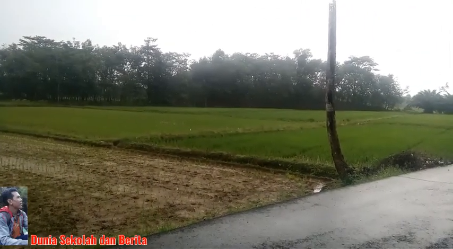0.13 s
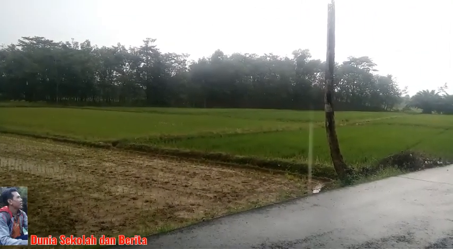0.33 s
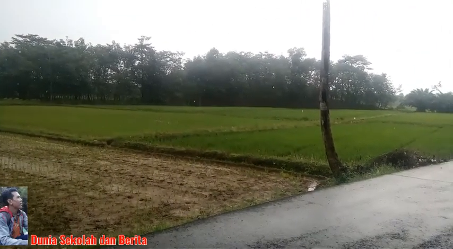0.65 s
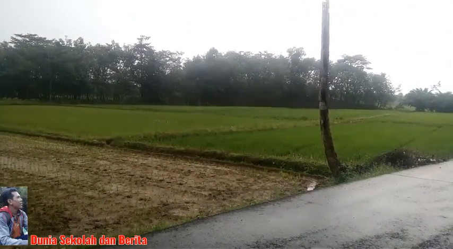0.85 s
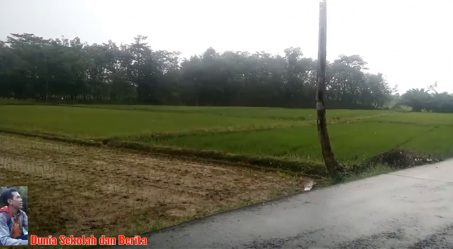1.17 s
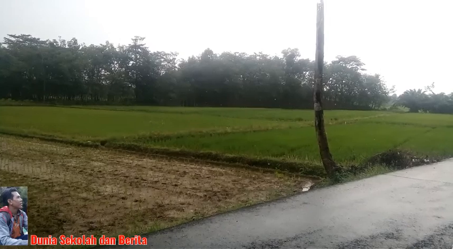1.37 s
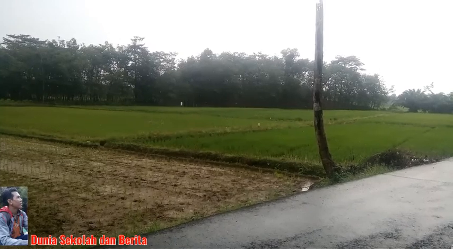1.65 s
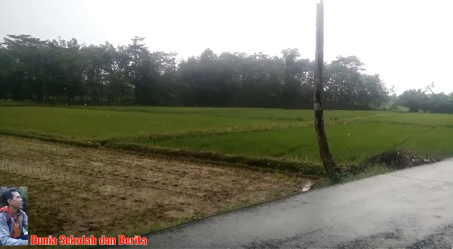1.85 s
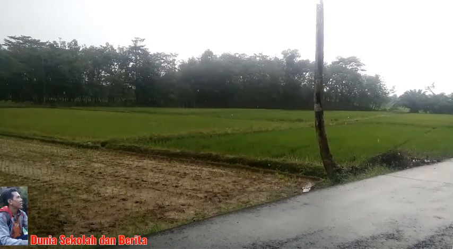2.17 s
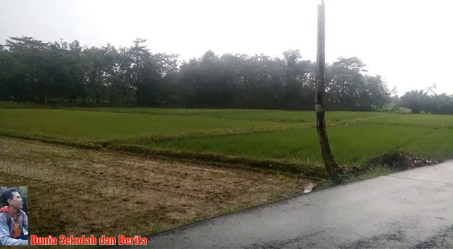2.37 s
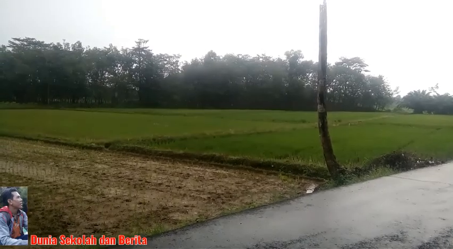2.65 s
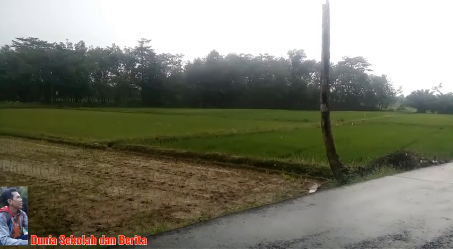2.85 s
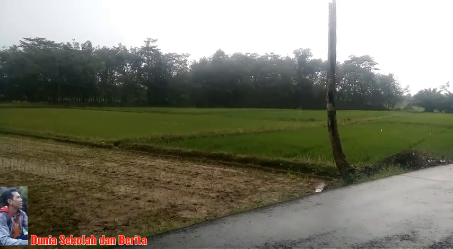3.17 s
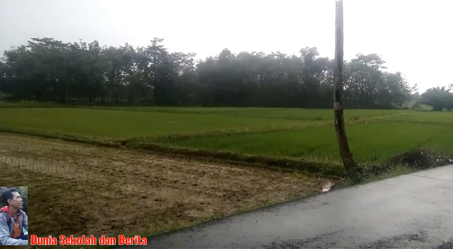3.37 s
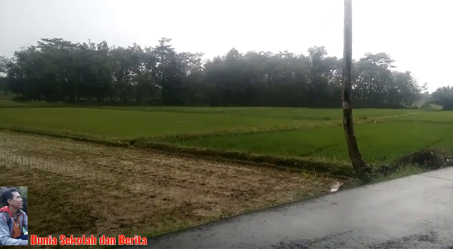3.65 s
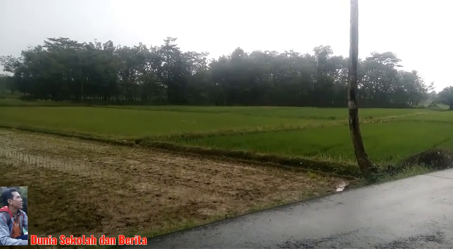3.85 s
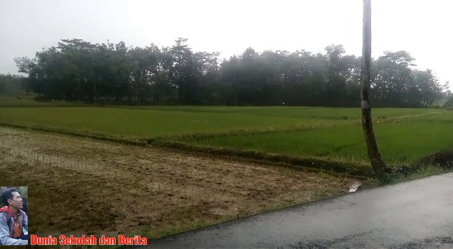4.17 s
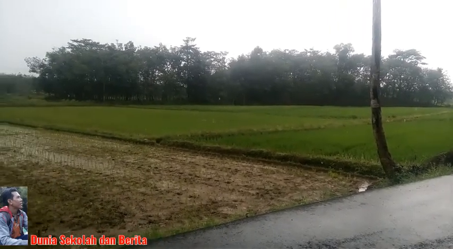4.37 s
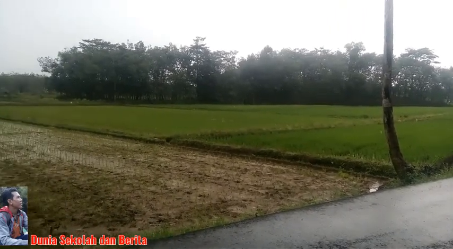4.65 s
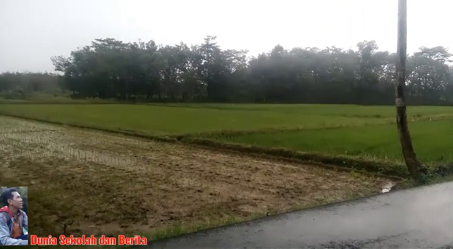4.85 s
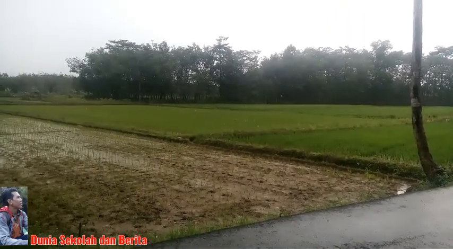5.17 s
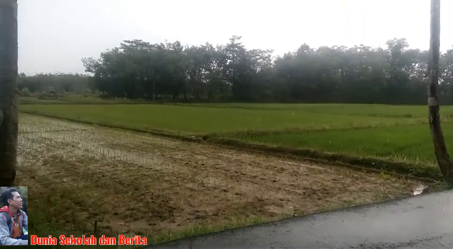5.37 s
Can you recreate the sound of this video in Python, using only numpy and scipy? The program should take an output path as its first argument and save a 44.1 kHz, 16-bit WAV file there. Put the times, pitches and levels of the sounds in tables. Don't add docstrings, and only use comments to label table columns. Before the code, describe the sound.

Continuous rain over open fields and a wet road, captured in mono by a small, narrow-sounding microphone. Distant drops merge into an even hiss centred around 4 kHz, with fine, clumpy patter on top. From 0 to about 1.1 seconds, very soft low wind bumps flutter beneath; one more comes near 1.4, and a faint breath of wind around 2.2. Close drops make short dry ticks with a small ringing splash: one at 0.4, a stronger one at 1.05, and the loudest, a sharp click, at about 1.75. The stretch from 1.9 to 3.1 is mostly plain rain with one tick near 2.65. Smaller ticks come often from 3.2 to 4.8, one splashier near 3.97, and a last one at 5.3. Patter thins near 4, briefly returns, then fades by 5.5 while the hiss stays steady. A very faint distant motor hums low; treble is thin, grainy and intermittently dropping out.

```python
import sys
import numpy as np
from scipy import signal
from scipy.fft import rfft, irfft
from scipy.io import wavfile
from scipy.ndimage import uniform_filter1d

SR = 44100
rng = np.random.default_rng(int(sys.argv[2]) if len(sys.argv) > 2 else 0)


def linear_from_db(decibels):
    return 10 ** (np.asarray(decibels, float) / 20)


def wav_out(sig):
    wavfile.write(sys.argv[1], SR, np.round(np.clip(np.atleast_2d(sig).T, -1, 1) * 32767).astype(np.int16))


N = 242991

# (time [s], hiss level [dB], patter level [dB])
SHOWER_DB = [
    (0.0, -39, -44.5),
    (4.0, -39.5, -51.5),
    (4.34, -39.5, -45.5),
    (5.12, -40, -50),
    (5.51, -38.5, -59),
]
# (frequency [Hz], density [dB per Hz])
PORT_DB = [(45, -19), (75, -13.5), (220, -16.5), (300, -16.5), (600, -12), (1200, -11), (2200, -7),
           (3300, -5), (4000, 0), (4600, -1), (5200, -9), (6500, -15.5), (7900, -29.5), (12000, -67.5)]
# (time [s], peak [dB], body [dB re peak], spray [dB re peak])
CLOSE_DROPS = [(0.077, -20.5, -15, -25), (0.4103, -16.5, -18, -17), (0.4258, -19.5, -9, -16),
               (1.0433, -13, -8.5, -14), (1.1488, -19.5, -8.5, -29), (1.4076, -20.5, -16, -13),
               (1.5913, -23.5, -10, -14), (1.7466, -7, -10, -17.5), (1.8386, -21.5, -12, -19),
               (1.8635, -17.5, -8.5, -32), (2.642, -19.5, -20, -20), (3.1713, -22, -15, -26),
               (3.3029, -17, -20, -18), (3.306, -25, -18, -21), (3.4145, -18.5, -12, -29),
               (3.4388, -23, -10, -28), (3.6559, -23.5, -5, -27), (3.7104, -22, -13, -30),
               (3.7602, -28, -7, -21), (3.9692, -19, -20, 3), (4.0649, -17, -12.5, -18),
               (4.1242, -22.5, 0, -23), (4.2699, -21, -30, -12), (4.3893, -22, -25, -10),
               (4.4582, -24, 1, -28), (4.7113, -22, -30, -21), (4.736, -23, -22, -19),
               (4.7767, -26, -8, -21), (4.5486, -26, -10, -18), (5.3014, -23, -15, -22)]
# (centre [Hz], density [dB per Hz])
DROP_PARTS_DB = [
    (700, 12.5),
    (2300, 4.5),
    (4200, 1.5),
    (6100, -4.5),
]
# (frequency [Hz], level [dB rms])
MOTOR_ORDERS = [
    (68, -65.5),
    (135.2, -68),
]
# (time [s], rumble level [dB])
WIND_DB = [
    (0, -58),
    (.38, -73),
    (.52, -62),
    (1.1, -60),
    (1.17, -79),
    (1.9, -81),
    (2.2, -62),
    (2.6, -80),
    (5.51, -61.5),
]
# (time [s], peak [dB], pitch [Hz])
WIND_BUMPS = [(.005, -39.5, 172), (0.033, -43, 101), (0.058, -43, 97), (0.258, -44, 104), (.293, -39, 109),
              (.335, -50, 70), (.5, -47, 125), (0.544, -44, 92.5), (0.595, -46, 89), (.645, -50, 270),
              (0.679, -45, 175), (.655, -47, 62), (.735, -47, 95), (.8, -44, 85), (0.869, -45, 137),
              (0.967, -38.5, 131), (1.0, -44.5, 75), (1.038, -42, 107), (1.107, -46.5, 83.4),
              (1.416, -44, 104)]
# (frequency [Hz], density [dB per Hz])
TOP_BAND_DB = [(7900, -31), (8300, -26), (8630, -4.5), (11500, -9.5), (12900, -16), (14900, -15),
               (15500, -13), (15800, -47)]
# (frequency [Hz], share [0-1])
EMPTIED_SHARE = [(6300, 0), (6800, .4), (7300, .72), (7700, .8), (8050, .975), (10000, .982), (12000, .993)]
# (start [s], length [frames])
STARVED_SPELLS = [(.02, 3), (.11, 2), (.25, 4), (.37, 8), (.74, 9), (.97, 1), (1.02, 2), (1.09, 2),
                  (1.23, 2), (1.37, 3), (1.64, 4), (1.76, 1), (1.81, 3), (1.9, 1), (2.02, 1), (2.06, 1),
                  (2.27, 1), (2.39, 3), (2.57, 5), (2.81, 3), (3.39, 3), (3.53, 1), (4.04, 2), (4.36, 3),
                  (4.45, 2), (4.66, 1), (4.71, 3), (4.94, 1), (5.15, 1), (5.4, 1)]

THUD_UNDER_KNOCK_DB, PORT_RING_DB = 10, 4
PORT_LAG_RADIUS = 0.62
SPLASH_DB, SPLASH_SPREAD_DB = -11.5, 3.5
TOP_BAND_RMS_DB = -73
FRAME_S, FRAME_START_S = 1024 / SR, 0.021
SHARP_DROP_DB, STRAY_DROPOUT_SHARE = -12, 0.06
STFT = dict(fs=SR, window="cosine", nperseg=1880, noverlap=940)


def at_hz(points, hz):
    point_hz, value = np.array(points).T
    return np.interp(np.log(hz + 1e-9), np.log(point_hz), value)


def in_time(rows):
    time_s, *columns = np.transpose(rows)
    return [np.interp(np.arange(N) / SR, time_s, column) for column in columns]


def rms_one(x):
    return x / np.sqrt(np.mean(x ** 2) + 1e-20)


def drift(rate_hz):
    r = np.exp(-80 * np.pi * rate_hz / SR)
    white = rng.standard_normal(N // 40 + 2002)
    slow = signal.lfilter([1], [1, -2 * r, r * r], white)[2000:]
    return np.interp(np.arange(N) / 40, np.arange(len(slow)), rms_one(slow))


def pulse(points):
    spectrum_db = at_hz(points, np.arange(4097) * SR / 8192)
    cepstrum = irfft(np.log(linear_from_db(spectrum_db)))
    cepstrum[1:4096] *= 2
    cepstrum[4097:] = 0
    return irfft(np.exp(rfft(cepstrum)))


def colour(x, points):
    return signal.fftconvolve(x, pulse(points))[:N]


def band(x, low_hz, high_hz, order=2):
    return signal.sosfilt(signal.butter(order, [low_hz, high_hz], "band", fs=SR, output="sos"), x)


def hiss(patchy_db):
    white, together = rng.standard_normal((2, N)), drift(35)
    total = np.zeros(N)
    for k, low_hz in enumerate(30 * 2 ** np.arange(9)):
        octave = band(white[k % 2], low_hz, 2 * low_hz)
        total += octave * linear_from_db(patchy_db * (0.68 * together + drift(23)))
    return rms_one(colour(total, PORT_DB))


def patter(per_s, spread_db):
    sizes = linear_from_db(spread_db * np.minimum(rng.exponential(1, N), 3.2)) * rng.choice([-1, 1], N)
    born = rng.random(N) < per_s * linear_from_db(5 * drift(60)) / SR
    surface = rng.integers(0, 4, N)
    clicks = sizes * born + 1e-18
    splats = clicks * (surface == 0)
    surfaces = [(307, 7500, 1.2), (2660, 6100, 1.1), (3900, 13400, 1.8)]
    for k, (low_hz, high_hz, level_db) in enumerate(surfaces, 1):
        splats = splats + linear_from_db(level_db) * band(clicks * (surface == k), low_hz, high_hz)
    return rms_one(colour(splats, PORT_DB))


def drop_impact(body_db, spray_db):
    shares_db = [body_db - THUD_UNDER_KNOCK_DB, body_db, 0, spray_db]
    parts = [(hz, db + share_db) for (hz, db), share_db in zip(DROP_PARTS_DB, shares_db)]
    thud, knock, tick, spray = parts
    below, low = (160, thud[1] - 14), (320, thud[1] + 1.5)
    dip = (3300, tick[1] - PORT_RING_DB)
    shoulder = (5000, tick[1] - 7)
    above = (9000, spray[1] - 18)
    impact = pulse([below, low, thud, knock, dip, tick, shoulder, spray, above])[:1024]
    return impact / np.abs(impact).max()


def close_drops():
    out, t = np.zeros(N + 1024), np.arange(1024) / SR
    noises = rng.standard_normal((len(CLOSE_DROPS), 1025))
    decay = np.exp(-t / 0.0019) * (t > 0.0005)
    for (time_s, peak_db, body_db, spray_db), (luck, *noise) in zip(CLOSE_DROPS, noises):
        splash_level = 1.8 * linear_from_db(SPLASH_DB + SPLASH_SPREAD_DB * luck)
        splash = splash_level * band(noise * decay, 2400, 4900)
        at = round((time_s - 0.0004) * SR)
        out[at:at + 1024] += linear_from_db(peak_db - 1.7) * (drop_impact(body_db, spray_db) + splash)
    poles = [1, -2 * PORT_LAG_RADIUS * np.cos(2 * np.pi * 4000 / SR), PORT_LAG_RADIUS ** 2]
    out = signal.lfilter(poles[::-1], poles, out)
    return signal.sosfilt(signal.butter(4, 8600, fs=SR, output="sos"), out[:N])


def wind():
    (rumble_db,) = in_time(WIND_DB)
    out = linear_from_db(rumble_db + 2.5 * drift(12)) * rms_one(band(rng.standard_normal(N), 55, 150))
    t = np.arange(N) / SR
    phases = rng.uniform(0, 2 * np.pi, (len(WIND_BUMPS), 1))
    for (time_s, peak_db, pitch_hz), phase in zip(WIND_BUMPS, phases):
        near = slice(max(0, int((time_s - 0.06) * SR)), int((time_s + 0.06) * SR))
        cycles = (t[near] - time_s) * pitch_hz
        push = np.exp(-(cycles / 0.67) ** 2)
        out[near] += linear_from_db(peak_db) * push * np.cos(2 * np.pi * cycles + phase)
    return out


def motor():
    turn_s = np.arange(N) / SR + np.cumsum(0.0023 * drift(5.7)) / SR
    out = np.zeros(N)
    for hz, level_db in MOTOR_ORDERS:
        level = np.sqrt(2) * linear_from_db(level_db + 0.89 * drift(5.6))
        out += level * np.sin(2 * np.pi * hz * turn_s)
    return out


def top_switch():
    frame = np.floor((np.arange(N) / SR - FRAME_START_S) / FRAME_S).astype(int) + 1
    on = np.where(rng.random(frame[-1] + 1) < STRAY_DROPOUT_SHARE, 0.2, 1.0)
    for start_s, frames in STARVED_SPELLS:
        first = round((start_s - FRAME_START_S) / FRAME_S) + 1
        on[first:first + frames] = 0.02
    for time_s, peak_db, *_ in CLOSE_DROPS:
        on[frame[int((time_s + 0.003) * SR)]] = 0.02 if peak_db < SHARP_DROP_DB else 2
    return uniform_filter1d(on[frame], size=260)


def top_band():
    on = top_switch()
    fill = on * linear_from_db(0.64 * drift(19)) * rng.standard_normal(N)
    return linear_from_db(TOP_BAND_RMS_DB) * rms_one(colour(fill, TOP_BAND_DB)), on


def thrifty_link(x):
    fill, on = top_band()
    hz, t, (z, filler) = signal.stft([x, fill], **STFT)
    row_hz = hz[:, None]
    share = (at_hz(EMPTIED_SHARE, hz) * (hz > 6200))[:, None]
    drop_times_s = np.array(CLOSE_DROPS)[:, :1]
    struck = np.abs(t - drop_times_s).min(axis=0) < FRAME_S / 2
    share = share * np.where(struck & (row_hz < 8000), 0.3, 1)

    bands = (hz // 350).astype(int)
    chance = rng.standard_normal((bands[-1] + 1, len(t)))[bands]
    poor = uniform_filter1d(on, size=3000)[np.minimum(t * SR, N - 1).astype(int)] < 0.1
    wealth_db = 7 * chance + 5 * rng.standard_normal(len(t)) - 22 * poor * (row_hz > 8300)
    kept = (rng.random(z.shape) > share ** linear_from_db(wealth_db)) & (row_hz < 12300)
    tall = (1 - share) ** -0.5

    edge_hz = 8000 + rng.exponential(600, len(t)) * ~struck
    filled = (row_hz > edge_hz) & ((chance < 0.8) | (row_hz > 11500))
    bump = np.abs(z[(hz > 50) & (hz < 180)]).max(axis=0)
    low_mid = (row_hz > 230) & (row_hz < 450)
    masked = low_mid & (np.abs(z) < linear_from_db(-19) * bump) & (t > 0.04)
    sent = z * kept * tall * ~masked + filler * filled
    return signal.istft(sent, **STFT)[1][:N]


def scene():
    hiss_db, patter_db = in_time(SHOWER_DB)
    far_rain = linear_from_db(hiss_db - 1.0) * hiss(patchy_db=1.06)
    near_rain = linear_from_db(patter_db) * patter(per_s=900, spread_db=-0.5)
    mono = far_rain + near_rain + close_drops() + motor() + wind()
    return np.array([mono, mono])


def low_pass(x):
    return signal.sosfilt(signal.butter(12, 16560, fs=SR, output="sos"), x)


def record(dry):
    mono = thrifty_link(dry[0])
    return low_pass(np.array([mono, mono]))


dry = scene()
out = record(dry)
wav_out(out)
```